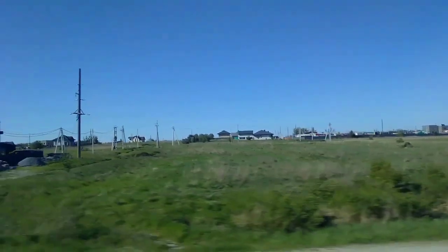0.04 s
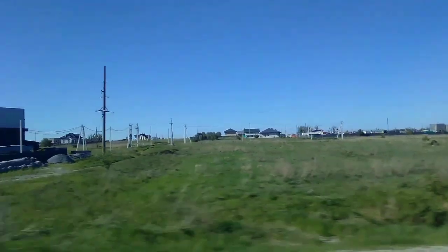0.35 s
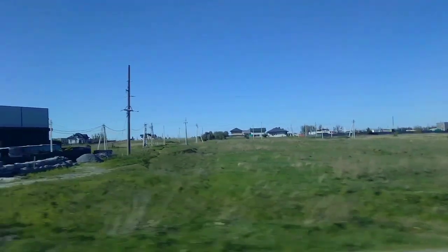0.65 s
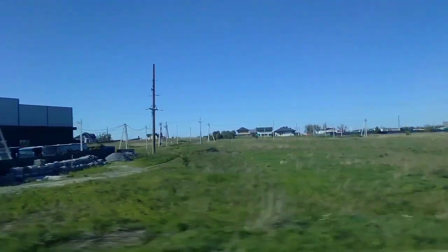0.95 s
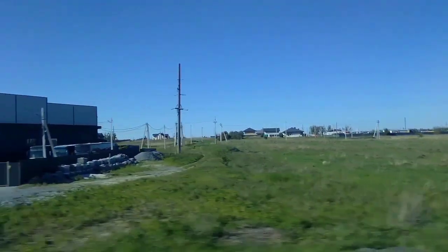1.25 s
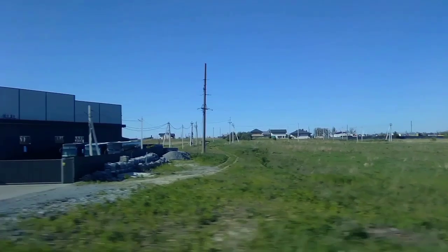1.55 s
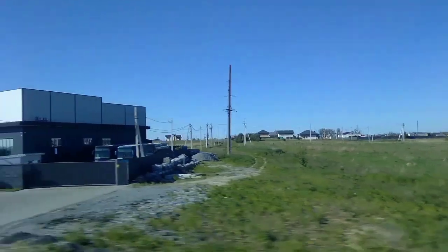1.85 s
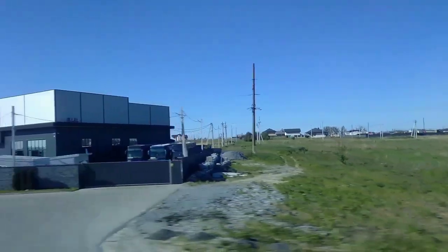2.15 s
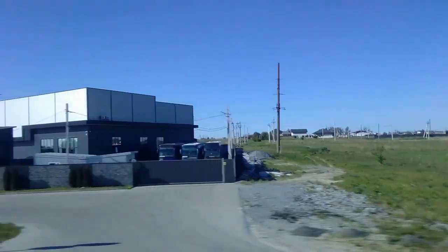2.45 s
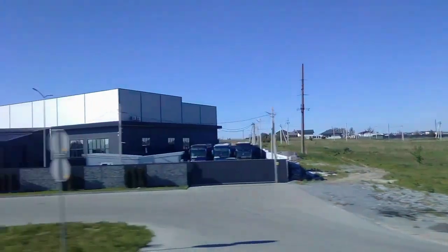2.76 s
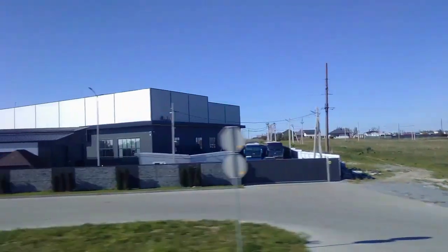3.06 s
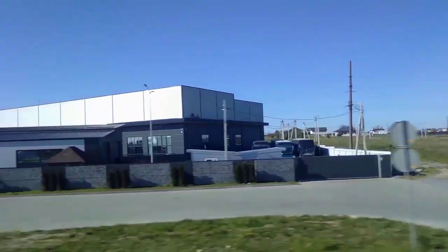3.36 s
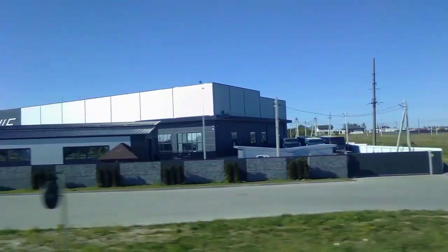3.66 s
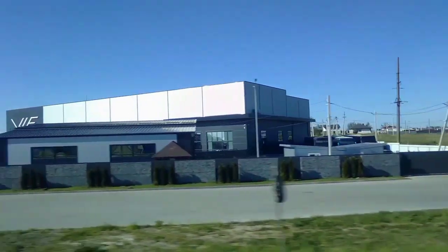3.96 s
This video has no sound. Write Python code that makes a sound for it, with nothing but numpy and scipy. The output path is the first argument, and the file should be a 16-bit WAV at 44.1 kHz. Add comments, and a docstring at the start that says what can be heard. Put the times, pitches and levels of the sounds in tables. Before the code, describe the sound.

A bus rumbles along, heard from inside, with a steady diesel hum, faint knocking and tyre noise. From about 0.3 to 1.3 seconds bumps make the cabin boom and thump while trim chatters and fittings tick. After a brief lull, more jolts come from 1.5 to 2.6 seconds, with sharp panel clacks near 2.1 and 2.4. The rumble then settles, and light ticks continue until 4 seconds.

```python
"""Inside a bus on an uneven road. From the start a diesel hums and knocks under steady tyre and air noise.
Within half a second the road roughens: the body booms and jolts, the trim chatters, loose fittings tick.
After a short lull comes a second rough patch, and just past two seconds a loose panel twice clacks sharply.
For the last second or so the boom settles and the ticks carry on, the engine now a touch slower."""
import sys
import numpy as np
from scipy import signal
from scipy.fft import rfft, irfft
from scipy.io import wavfile
from scipy.ndimage import uniform_filter1d

SR = 44100
rng = np.random.default_rng(int(sys.argv[2]) if len(sys.argv) > 2 else 0)


def unload_audio(sound):
    """Save the sound as a 16-bit wav file, at the path given as the first command line argument."""
    columns = np.transpose(np.atleast_2d(sound))
    # keep every value between -1 and 1, then stretch to whole-number steps
    steps = np.round(np.clip(columns, -1, 1) * 32767)
    wavfile.write(sys.argv[1], SR, steps.astype(np.int16))


N = 176400
TIME = np.arange(N) / SR

# tyre and air bed: frequency_hz, relative_db
ROLLING_COLOUR = [(20, -35), (40, -15.5), (72, -5), (115, -10), (160, -42), (200, -17), (260, -4),
                  (340, 6.5), (400, 2.5), (530, 0), (700, -7.5), (800, -7.5), (1000, -11.5), (1350, -20),
                  (1900, -15), (2300, -22), (2700, -31.5), (4500, -37), (7000, -41), (9000, -44),
                  (16000, -46.5)]
# crankshaft speed: time_s, turns_per_s
ENGINE_SPEED = [(0, 21.02), (1.45, 21.03), (1.75, 20.8), (3.25, 20.43), (4, 20.46)]
# partials of the engine hum: cycles_per_turn
HUM_ORDERS = [3, 4, 5.5, 12, 15, 16, 16.5, 38.5]
# balance of those partials: level_db
HUM_LEVELS = [-86, -71.5, -75, -64.5, -69, -61, -60.5, -77.5]
# diesel knocks in each turn: position_turns, level_db
KNOCKS = [(0.349, -60.5), (0.761, -72.5)]
# how hard the engine knocks: time_s, gain_db
KNOCK_FORCE = [(0, 0), (.4, -1.5), (.7, 2), (1.3, 2), (1.9, 0.5), (2.7, -1.5), (2.9, 2), (3.45, 0),
               (3.8, 4), (4, -1)]
# grit in the knock: frequency_hz, relative_db
KNOCK_COLOUR = [(900, -25), (1400, -4), (1750, 11.5), (1950, -3.5), (2250, 8.5), (2600, -48), (4000, -27)]
# ring of the engine block: pitch_hz, relative_db
BLOCK_MODES = [(1760, -4), (1905, -2), (2150, -6.5)]
# swells of the trim chatter: time_s, level_db
CHATTER_LEVEL = [(0, -89), (.6, -85.5), (.78, -78), (.9, -73.5), (1.2, -76), (1.47, -77), (1.56, -75),
                 (1.65, -70), (1.76, -76), (1.85, -81), (2.05, -76), (2.18, -77), (2.28, -84.5),
                 (2.46, -75.5), (2.62, -70), (2.74, -83), (3.05, -84.5), (3.3, -80), (3.45, -81.5),
                 (3.63, -77.5), (3.85, -85.5), (4, -82)]
# tone of the trim contacts: frequency_hz, relative_db
CHATTER_COLOUR = [(600, -7), (1500, 6), (2600, -2.5), (3400, 0.5), (4600, -5.5), (5800, -4), (7400, -4),
                  (8600, -8.5), (10500, -16), (16000, -42)]
# ring of the trim: pitch_hz, width_hz, relative_db
TRIM_MODES = [(2806, 130, -15), (3900, 32, -30.5), (4440, 190, -14.5), (4970, 55, -14.5), (5800, 69, -19),
              (6750, 280, -22.5)]
# ticks of loose fittings: start_s, level_db, pitch_hz
TICKS = [(0.176, -61, 6040), (0.2988, -61, 6060), (0.5136, -65, 4800), (0.5794, -66.5, 4900),
         (0.661, -57.5, 6000), (0.798, -60.5, 6000), (0.863, -63, 5200), (.875, -71, 6500),
         (0.9235, -65, 5800), (.933, -60, 4500), (.959, -70, 6500), (1.008, -55.5, 7050),
         (1.0795, -71, 4370), (1.092, -61, 4600), (1.102, -67, 5000), (1.138, -75, 5500),
         (1.182, -60.5, 6040), (1.2135, -71, 7000), (1.245, -64, 4950), (1.3184, -69, 4800),
         (1.374, -64.5, 4970), (1.4002, -66, 5560), (1.511, -70, 6200), (1.595, -65, 6100),
         (1.607, -61, 6860), (1.619, -64, 5000), (1.662, -69, 5030), (1.687, -69, 6300), (1.7, -68, 4600),
         (1.712, -72, 5500), (1.76, -63, 6200), (1.7825, -61, 4900), (1.8966, -59.5, 5150),
         (2.334, -63.5, 5700), (2.367, -74, 6340), (2.446, -60.5, 4940), (2.514, -66, 5000),
         (2.585, -57, 4540), (2.803, -58, 6600), (2.888, -58, 6300), (3.187, -63, 6000), (3.285, -65, 6940),
         (3.3293, -67, 6000), (3.403, -64, 6800), (3.499, -65, 6440), (3.5618, -67, 4770),
         (3.584, -68, 6000), (3.615, -65, 4500), (3.7155, -59.5, 5600), (3.7907, -58.5, 6200),
         (3.964, -62.5, 6300)]
# tone shared by the ticks: frequency_hz, relative_db
TICK_COLOUR = [(800, 15), (2500, -3), (4500, 3.5), (7400, 1.5), (9000, -13), (12000, -21.5), (16000, -27)]
# loose panel hits: start_s, level_db, decay_s, top_gain_db, body_gain_db, ring_gain_db
CLACKS = [(0.8288, -55, 0.0085, -27, -0.5, -2), (1.531, -54, 0.0051, -20, 2, -16),
          (2.118, -58.5, 0.0034, 2, 0, -16), (2.1316, -46, 0.0047, 9, -12, 0.5),
          (2.3788, -49, 0.0099, -10, -3, -35), (2.4112, -59, 0.0024, 5, 11, -12),
          (3.2673, -59.5, .0045, -20, 3, -19)]
# crack of those hits: frequency_hz, relative_db
CLACK_COLOUR = [(300, -2), (900, 14.5), (1400, 9), (2200, 2.5), (4000, 0.5), (6000, -0.5), (7100, 4.5),
                (8600, -11), (9800, -15), (12500, -28), (16000, -26)]
# ring of the loose panel: pitch_hz, decay_s, relative_db
CLACK_MODES = [(899, 0.011, -8), (1392, 0.0062, -2.5), (1643, 0.014, -11), (2490, 0.0099, -17.5),
               (5330, 0.0051, -9), (5760, 0.0052, -19), (6880, 0.0033, -12), (8680, 0.005, -6.5)]
# bright ring of its frame: pitch_hz, width_hz, relative_db
FRAME_MODES = [(7080, 400, -22), (8150, 700, -21)]
# wheels meeting bumps: start_s, level_db, floor_gain_db
JOLTS = [(.318, -46, -10), (0.382, -48.5, 2), (0.542, -39.5, -9), (.642, -45, -14), (.832, -48.5, -14),
         (.928, -38, -12), (0.983, -39, -1), (1.163, -41.5, -21), (1.215, -43, -4), (1.508, -41, -22),
         (1.626, -41.5, 1.5), (1.685, -38.5, -8), (1.717, -46.5, 0), (1.888, -49.5, 6), (2.181, -48, 5),
         (2.403, -46, -13), (2.462, -40, -1.5), (2.514, -46, -5), (2.566, -46.5, -11), (2.612, -50.5, -7)]
# knock of the body shell: pitch_hz, relative_db
SHELL_MODES = [(212, -7.5), (250, -1.5), (284, -3.5), (338, -5)]
# thump of the floor: pitch_hz, relative_db
FLOOR_MODES = [(84, -13), (116, -6), (134, -10.5)]
# swells of the suspension rumble: time_s, relative_db
RUMBLE_SWELL = [(0, -62.5), (.15, -65.5), (.42, -59), (.65, -58), (.85, -66), (1.02, -61), (1.25, -57),
                (1.48, -77), (1.64, -58), (1.8, -66), (2.08, -68.5), (2.2, -62), (2.35, -65), (2.55, -59.5),
                (2.8, -64), (3.35, -68), (3.52, -63.5), (4, -69.5)]
# weight of that rumble: frequency_hz, relative_db
RUMBLE_COLOUR = [(20, -30), (42, -21), (58, -5), (76, 4.5), (92, 3.5), (118, 8.5), (140, -6), (164, -20),
                 (220, -49.5), (800, -90.5)]
# how hard the road shakes the body: time_s, level_db
ROAD_SHAKE = [(0, -57), (.09, -60.5), (.24, -54.5), (.35, -51.5), (.41, -47), (.5, -45.5), (.68, -49),
              (.78, -47.5), (.88, -49.5), (.96, -45.5), (1.04, -48.5), (1.08, -55), (1.14, -48.5),
              (1.21, -46.5), (1.26, -55), (1.47, -58), (1.55, -51), (1.6, -56), (1.65, -51.5),
              (1.71, -49.5), (1.84, -54), (1.91, -52.5), (2.09, -60.5), (2.15, -51), (2.25, -51),
              (2.33, -62), (2.44, -55.5), (2.49, -50), (2.54, -53.5), (2.63, -51.5), (2.71, -63.5),
              (3.25, -58), (4, -62)]
# boom of the cabin: frequency_hz, relative_db
BOOM_COLOUR = [(60, -55), (140, -27), (164, -30.5), (185, -14.5), (215, -5.5), (245, -2), (300, 3),
               (345, 3.5), (375, -10), (450, -23.5), (700, -31), (1500, -71.5), (5000, -100)]
# droning body panels: pitch_hz, width_hz, relative_db
BODY_PANELS = [(115.5, 4.4, -18.5), (314.4, 4, -7), (337.6, 11, -6)]


def from_db(db):
    """Decibels to gain."""
    return 10 ** (np.asarray(db) / 20)


def unit_rms(x):
    """Scale to unit rms."""
    return x / np.sqrt(np.mean(x ** 2) + 1e-20)


def curve(rows):
    """Straight ramps between (time_s, value) points."""
    return np.interp(TIME, *np.transpose(rows))


def noise(colour):
    """Unit noise shaped by (frequency_hz, relative_db) points."""
    hz, db = np.transpose(colour)
    bins = np.maximum(np.fft.rfftfreq(N, 1 / SR), 1)
    gain = from_db(np.interp(np.log(bins), np.log(hz), db))
    return unit_rms(irfft(rfft(rng.standard_normal(N)) * gain, N))


def drift(rate_hz):
    """Random wander of unit rms, mostly slower than rate_hz."""
    bins = np.fft.rfftfreq(N, 1 / SR)
    return unit_rms(irfft(rfft(rng.standard_normal(N)) / (1 + (bins / rate_hz) ** 4), N))


def butter(order, hz, kind="low"):
    """Butterworth filter sections."""
    return signal.butter(order, hz, kind, fs=SR, output="sos")


def resonate(x, hz, width_hz):
    """One resonance with unity gain at its peak."""
    r = np.exp(-np.pi * width_hz / SR)
    feedback = [1, -2 * r * np.cos(2 * np.pi * hz / SR), r * r]
    return signal.lfilter(np.array([1, 0, -1]) * (1 - r * r) / 2, feedback, x + 1e-18)


def levelled(x, samples):
    """Hold the slow level at 1, keeping the fast flutter."""
    return x / np.sqrt(uniform_filter1d(x * x, samples) + 1e-12)


def decays(clicks, decay_s):
    """Envelope of overlapping contacts, each dying away."""
    return np.sqrt(signal.lfilter([1], [1, -np.exp(-2 / (decay_s * SR))], clicks ** 2 + 1e-18))


def strike(start_s, rise_s, decay_s, tail_db=-19, tail_s=0.021):
    """Envelope of one hit, with the cabin's short tail."""
    age = np.maximum(TIME - start_s, 0)
    tail = from_db(tail_db) * np.exp(-age / tail_s)
    return (1 - np.exp(-age / rise_s)) * (np.exp(-age / decay_s) + tail)


def with_ring(hits, grain, modes):
    """Hits plus the modes they excite, balanced against their source noise, grain."""
    return hits + sum(from_db(db) * resonate(hits, hz, width) / np.std(resonate(grain, hz, width))
                      for hz, width, db in modes)


def partials(modes):
    """Sines from (pitch_hz, level_db) rows, at random phases."""
    return sum(from_db(db) * np.sin(2 * np.pi * (hz * TIME + rng.random())) for hz, db in modes)


def tyres_and_air(level_db=-57.5):
    """Rolling tyres and passing air lay a steady bed of noise."""
    return from_db(level_db) * noise(ROLLING_COLOUR)


def engine_hum(turns, road_db, waver_db=4, road_share=0.33):
    """Wavering multiples of the crank speed, swelling a little with the road."""
    hum = np.zeros(N)
    for order, db in zip(HUM_ORDERS, HUM_LEVELS):
        gain = from_db(db + waver_db * drift(rate_hz=2))
        phase = 2 * np.pi * (order * turns + rng.random()) + 0.34 * drift(rate_hz=4.7)
        hum += gain * np.sin(phase)
    return hum * from_db(road_share * (road_db - road_db.mean()))


def diesel_knock(turns, spread_db=2.2, wander_rad=3, grit_db=-5.5):
    """Two gritty knocks a turn, one strong, one weak, ring the engine block."""
    clicks = np.zeros(N)
    for position, db in KNOCKS:
        at = np.flatnonzero(np.diff(np.floor(turns - position)))
        clicks[at] += from_db(db + spread_db * rng.standard_normal(len(at)))
    block = sum(from_db(db) * np.sin(2 * np.pi * hz * TIME + wander_rad * drift(rate_hz=20))
                for hz, db in BLOCK_MODES)
    force = uniform_filter1d(decays(clicks, decay_s=0.0023), size=60) * from_db(curve(KNOCK_FORCE))
    return force * (block + from_db(grit_db) * noise(KNOCK_COLOUR))


def trim_chatter(contacts_per_s=180, spread_db=3.5):
    """A spray of tiny, uneven contacts rings the interior trim."""
    touches = rng.random(N) < contacts_per_s / SR
    clicks = touches * from_db(spread_db * np.clip(rng.standard_normal(N), -2, 1.5))
    grain = noise(CHATTER_COLOUR)
    contacts = uniform_filter1d(decays(clicks, decay_s=0.005), size=130) * grain
    chatter = signal.sosfilt(butter(2, hz=7800), with_ring(contacts, grain, TRIM_MODES))
    return from_db(curve(CHATTER_LEVEL)) * levelled(chatter, samples=6000)


def fitting_ticks(ring_gain=1.8):
    """Each loose fitting spits a short burst, brightest at its own pitch."""
    grain = noise(TICK_COLOUR)
    ticks = np.zeros(N)
    for start_s, db, hz in TICKS:
        tone = unit_rms(grain + ring_gain * resonate(grain, hz, width_hz=500))
        ticks += from_db(db) * strike(start_s, rise_s=0.00088, decay_s=0.0053) * tone
    return ticks


def panel_clacks(rise_s=0.0005, top_decay_s=0.0037):
    """A loose panel cracks against its frame; the freer it is after the blow, the more it rings."""
    grain = noise(CLACK_COLOUR)
    top = signal.sosfiltfilt(butter(6, hz=8400, kind="high"), grain)
    body = signal.sosfiltfilt(butter(2, hz=2200), grain)
    hits, blows = np.zeros(N), np.zeros(N)
    for start_s, db, decay_s, top_db, body_db, ring_db in CLACKS:
        crack = grain + (from_db(body_db) - 1) * body  # low shelf
        hits += from_db(db) * strike(start_s, rise_s, decay_s) * crack
        hits += from_db(db + top_db) * strike(start_s, rise_s, top_decay_s) * top
        blows[int(start_s * SR)] = from_db(db + ring_db)
    panel = sum(decays(blows, decay_s) * partials([(hz, db)]) for hz, decay_s, db in CLACK_MODES)
    return with_ring(hits, grain, FRAME_MODES) + panel


def suspension_rumble(gain_db=-3.5):
    """The suspension adds a deep, heaving rumble."""
    return from_db(curve(RUMBLE_SWELL) + gain_db) * levelled(noise(RUMBLE_COLOUR), samples=5000)


def bump_jolts():
    """Each bump knocks the body shell and thumps the floor."""
    jolts = np.zeros(N)
    for start_s, db, floor_db in JOLTS:
        thud = partials(SHELL_MODES) + from_db(floor_db) * partials(FLOOR_MODES)
        jolts += from_db(db) * strike(start_s, rise_s=0.0058, decay_s=0.024) * thud
    return jolts


def body_boom(road_db):
    """The road shakes the cabin into a low boom and sets its panels droning."""
    boom = levelled(noise(BOOM_COLOUR), samples=3500)
    panels = sum(from_db(db) * levelled(resonate(rng.standard_normal(N), hz, width), samples=9000)
                 for hz, width, db in BODY_PANELS)
    drone = signal.sosfilt(butter(2, hz=[90, 420], kind="band"), panels)
    return from_db(road_db) * (boom + drone)


def scene():
    """The mono mix from a window seat."""
    road_db = curve(ROAD_SHAKE)
    turns = np.cumsum(curve(ENGINE_SPEED)) / SR
    bed = tyres_and_air() + engine_hum(turns, road_db) + diesel_knock(turns)
    rattles = trim_chatter() + fitting_ticks() + panel_clacks()
    low_end = suspension_rumble() + bump_jolts() + body_boom(road_db)
    return (bed + rattles + low_end)[None]


def record(dry, hiss_db=-92, stop_hz=16400):
    """Faint hiss, then a steep cut of the very top."""
    hissy = dry + from_db(hiss_db) * rng.standard_normal(dry.shape)
    return signal.sosfilt(signal.cheby2(16, 60, stop_hz, fs=SR, output="sos"), hissy)


dry = scene()
out = record(dry)
unload_audio(out)
```